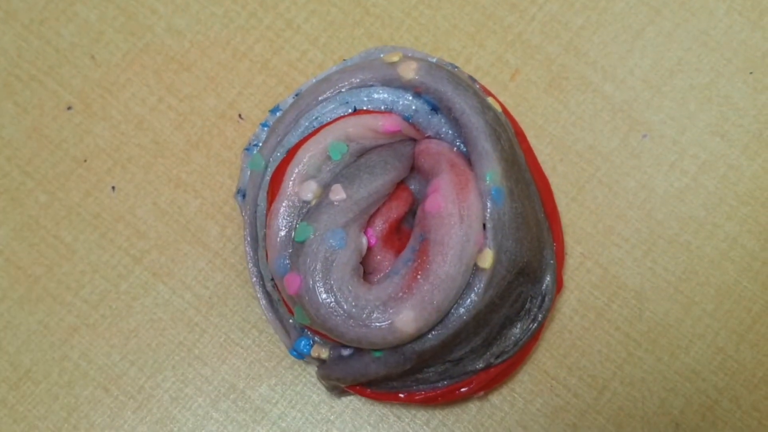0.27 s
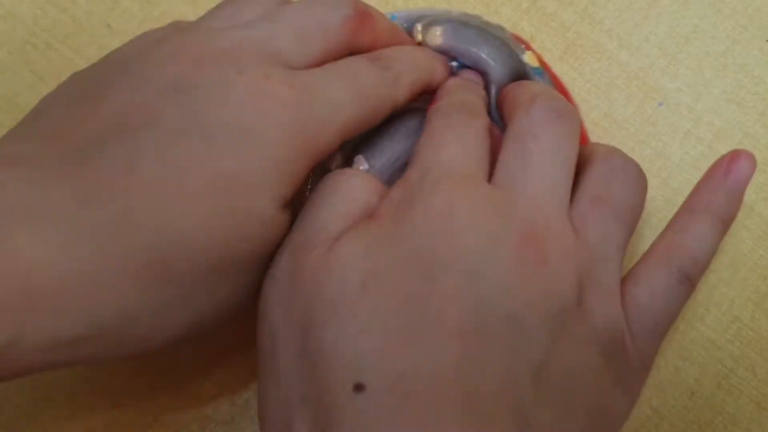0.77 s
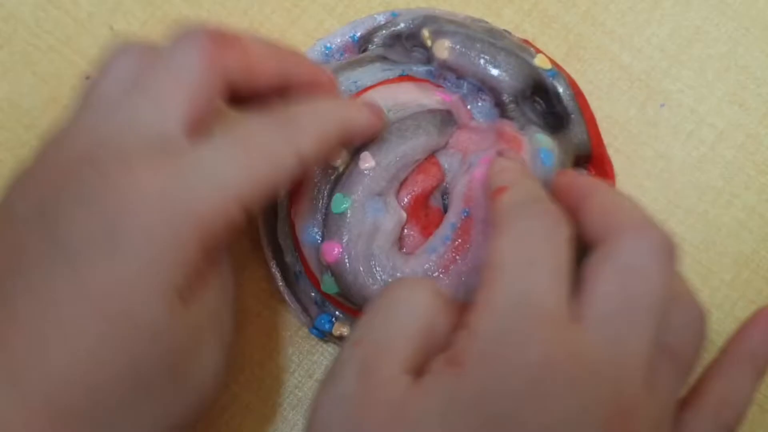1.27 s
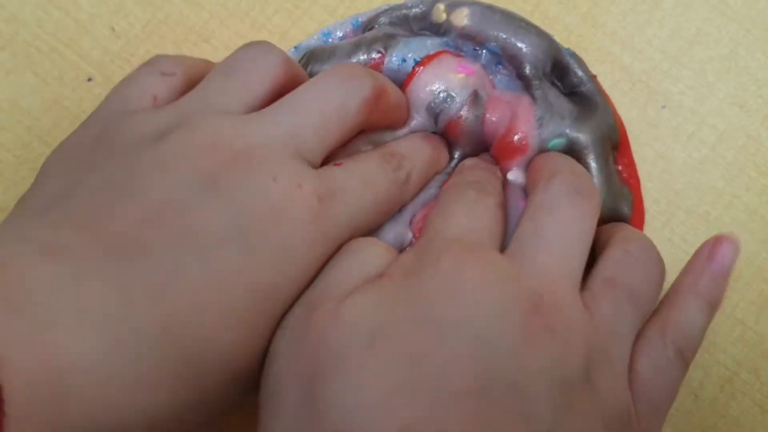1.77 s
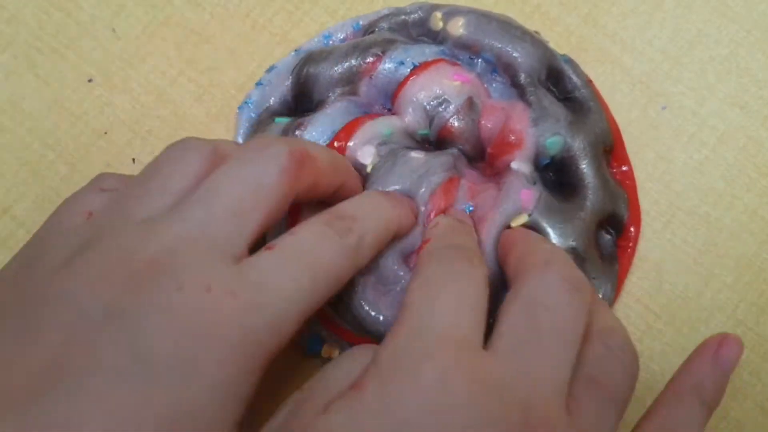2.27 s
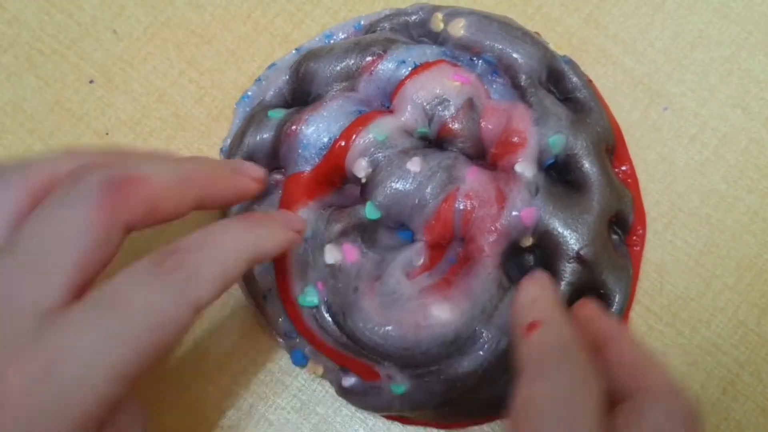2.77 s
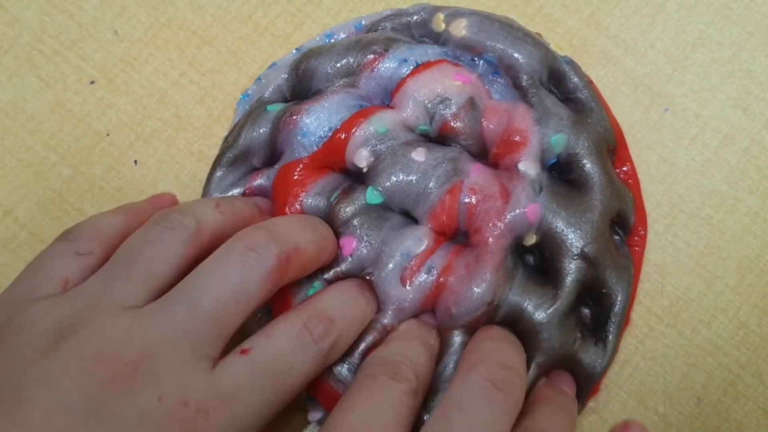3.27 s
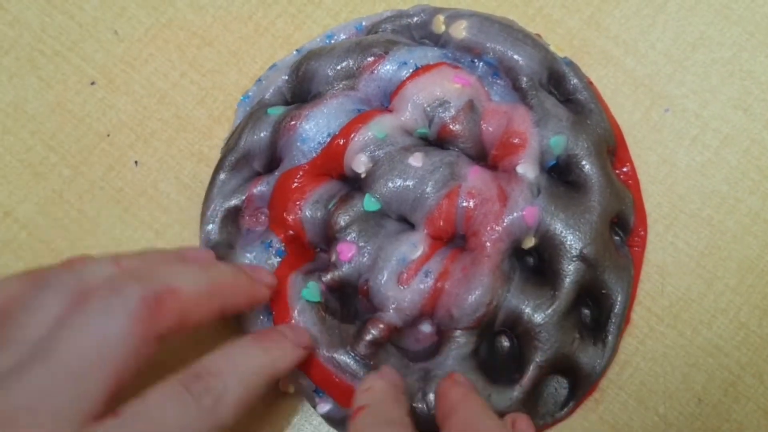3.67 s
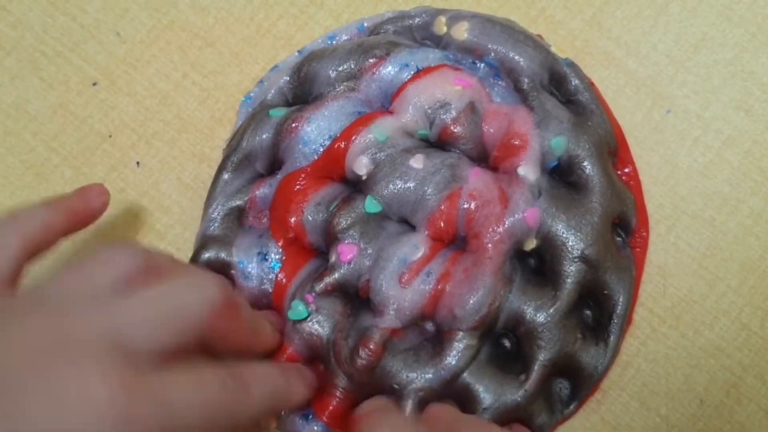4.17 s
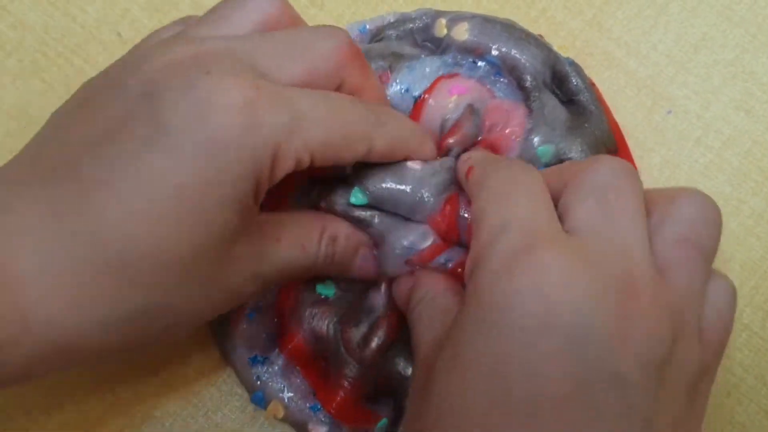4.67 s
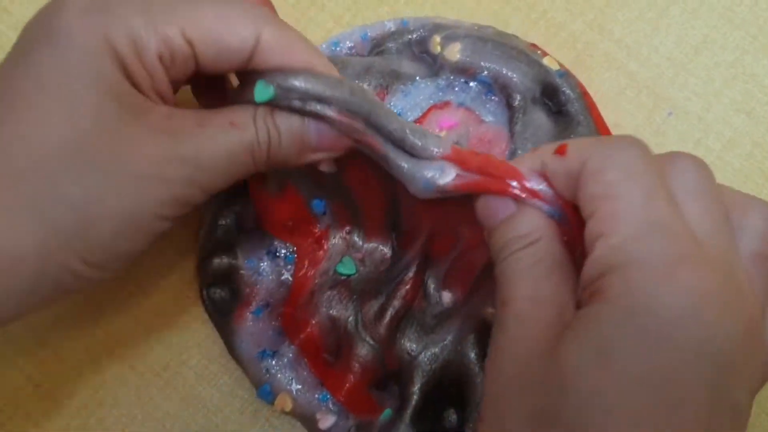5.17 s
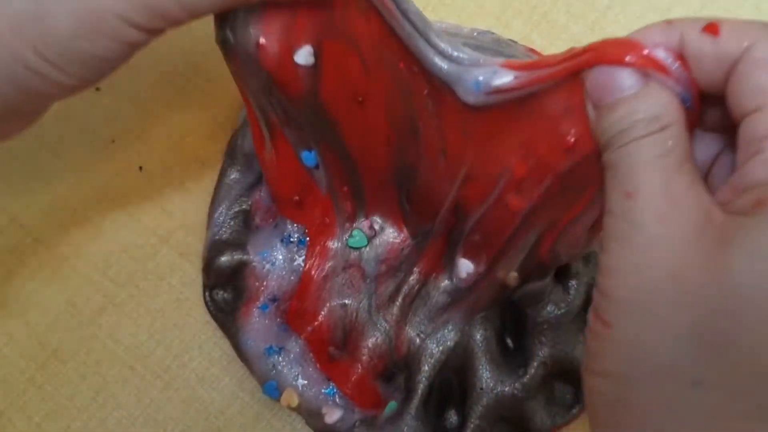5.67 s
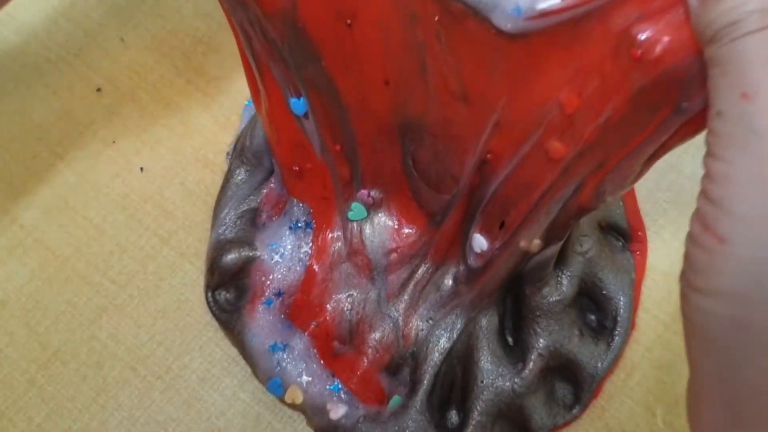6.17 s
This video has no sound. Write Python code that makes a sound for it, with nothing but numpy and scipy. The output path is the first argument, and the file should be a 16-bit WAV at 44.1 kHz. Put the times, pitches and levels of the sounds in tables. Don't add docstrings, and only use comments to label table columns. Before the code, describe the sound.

Close stereo sound of fingers poking and pulling sticky slime. Each release is a very brief, bright, crackling snap with little round pops beneath, followed by a short live room ring. Between them are tiny clicks, squelchy air bubbles and dull low booms from hands pressing the table. Four main bursts in the first half give way to a lighter rip, thin peeling and quiet ticks over soft hiss.

```python
import sys
import numpy as np
from scipy import signal
from scipy.fft import rfft, irfft, next_fast_len
from scipy.io import wavfile
from scipy.ndimage import uniform_filter1d

SR = 44100
rng = np.random.default_rng(int(sys.argv[2]) if len(sys.argv) > 2 else 0)


def how_loud(loudness_db):
    steps = np.asarray(loudness_db, float) / 20
    return 10 ** steps


def put_to_file(sound):
    columns = np.atleast_2d(sound).T
    safe = np.clip(columns, -1, 1)
    whole_steps = np.round(safe * 32767)
    wavfile.write(sys.argv[1], SR, whole_steps.astype(np.int16))


N = 283562


def unit(x):
    return x / np.sqrt(np.mean(x ** 2) + 1e-20)


def along(points, hz):
    point_hz, value = np.transpose(points)
    return np.interp(np.log(hz + 1), np.log(point_hz + 1), value)


def filtered(x, response):
    size = next_fast_len(N + SR // 2)
    return irfft(rfft(x, size) * response(np.fft.rfftfreq(size, 1 / SR)), size)[..., :N]


def thin(x, corner_hz):
    return filtered(x, lambda hz: (1j * hz / (corner_hz + 1j * hz)) ** 2)


def rush(spectrum, alike):
    mid, side = filtered(rng.standard_normal((2, N)), lambda hz: how_loud(along(spectrum, hz)))
    turn = np.arccos(np.clip(alike, -1, 1)) / 2
    mid, side = np.cos(turn) * mid, np.sin(turn) * side
    return unit(np.array([mid + side, mid - side]))


def steady(x, hold_s):
    power = uniform_filter1d(np.mean(x ** 2, 0), int(hold_s * SR))
    return x / np.sqrt(np.abs(power) + 0.038)


def bursts(rows, rise, fade, bell, scatter_s, size):
    s, db, hz, pan_db, cycles = np.transpose(rows)[:, :, None]
    chance = rng.random((len(rows), 2))
    life_s = np.clip(cycles, 0.3, 12) / hz
    start_s = s - rise * life_s
    index = np.floor(start_s * SR).astype(int) + np.arange(size)
    out = []
    for sign in (1, -1):
        late_s = (sign < 0) * (0.00003 + scatter_s * chance[:, 1:])
        t = np.maximum(index / SR - start_s - late_s, 0) / life_s
        shape = (1 - np.exp(-(t / rise) ** 2)) * np.exp(-fade * t - bell * t * t)
        wave = np.sin(2 * np.pi * (hz * life_s * t + chance[:, :1]))
        wave *= shape / shape.max(1, keepdims=True) * how_loud(db + sign * pan_db / 2)
        out.append(np.bincount(index.ravel(), wave.ravel(), N + size)[:N])
    return np.array(out)


def slime():
    tearing = tears(np.vstack([films(), swarms()]))
    direct = thin(tearing, 970) + thin(pops(), 180)
    return direct, thin(tears(bounces()), 1300)


def tears(rows):
    return how_loud(3) * bursts(rows, rise=0.45, fade=2.7, bell=2.3, scatter_s=0.00014, size=144)


def films():
    # (time [s], peak level [dB], pitch [Hz], left-right [dB])
    snaps = [(1.0317, -19.5, 7200, -7.5), (1.064, -17.5, 3380, -11), (1.8028, -2, 14290, -9),
             (1.8062, -9.5, 7500, 1), (1.8331, -2, 11200, -5), (1.8367, -11.5, 7540, 0.5),
             (1.8399, -2.5, 8600, 2), (2.2745, -18.5, 12200, -2.5), (2.3678, -35.5, 9210, 0),
             (2.608, -19, 9900, -2), (2.6386, -10, 10830, 2), (2.6412, -5.5, 10900, 3),
             (2.6434, -2, 10500, -1.9), (1.044, -20.5, 14930, -1.5), (2.6451, -14.5, 6840, -1.5),
             (2.6516, -11, 10100, 0.5), (2.6518, -3, 4470, -10), (3.4316, -27.5, 14570, 3),
             (3.4346, -22.5, 8960, -1), (3.4372, -8, 13600, -0.5), (3.4692, -10.5, 10670, 1),
             (3.9897, -32.5, 9100, 7.5), (4.1235, -28, 10500, 5.5), (4.1332, -14.5, 12500, 5.5),
             (4.1575, -19.5, 10750, 0.5), (4.6346, -15, 7900, 7), (4.6353, -13, 11400, 8),
             (4.6756, -7, 14050, 8), (5.5675, -19.5, 14040, 5.5), (5.5677, -24, 8200, 5),
             (1.0422, -18.5, 7880, -0.5), (1.0447, -22.5, 7540, -0.5), (1.0462, -16, 11670, -1),
             (1.0472, -16.5, 13180, -2.5), (1.0549, -25.5, 7750, -4), (1.8075, -14.5, 12100, -3),
             (1.8392, -6.5, 7700, -2.5), (1.8411, -10.5, 11930, -4.5), (2.6427, -7.5, 7490, 3.5),
             (2.6444, -3, 11900, -2), (3.4365, -14, 9780, 1.5), (3.4385, -9.5, 13800, -3.5),
             (3.4639, -7.5, 6500, -7), (3.4652, -9.5, 11330, -7.5), (3.4667, -8, 11800, -7.5),
             (3.4719, -4.5, 6900, 2), (3.4739, -5.5, 7570, -3), (4.6771, -4.5, 14130, -7),
             (4.6824, -24, 9100, 0), (4.6357, -20.5, 7300, -1)]
    # (time [s], peak level [dB], pitch [Hz], left-right [dB])
    ticks = [(.8712, -35, 9160, -6.5), (1.156, -48.5, 7390, -1.5), (1.1813, -38, 12110, 12.5),
             (1.4435, -51.5, 8120, -17), (2.2161, -33, 10320, -5.5), (2.252, -41, 7890, -5.5),
             (2.279, -30.5, 10620, -11), (2.3322, -36, 14910, -5), (2.3772, -33, 10710, -7),
             (2.4869, -48, 10190, -1), (2.5807, -34, 10410, 3.5), (3.1032, -39, 14520, 4.5),
             (3.114, -40.5, 5280, -2.5), (3.2659, -45.5, 13540, -13.5), (3.6481, -32.5, 13600, 3.5),
             (3.9259, -41, 11590, 2), (4.5632, -41, 9530, 2), (4.8034, -41.5, 8780, -6),
             (4.8257, -31.5, 9550, -14), (4.844, -28, 10670, -7), (4.93, -28.5, 6420, -1),
             (4.9904, -37.5, 7550, 2), (5.0081, -28.5, 12460, 7), (5.0349, -29.5, 11930, 8),
             (5.1604, -34.5, 11100, 1), (5.265, -35.5, 12100, -8.5), (5.9438, -35.5, 6970, 15),
             (6.139, -45.5, 7380, -1), (6.2306, -46.5, 7340, -3), (6.2964, -50.5, 7100, 2.5)]
    snap_life_s, tick_life_s = 0.00019, 0.00029
    twin_db, twin_pitch = -16.5, 0.49
    rows = np.vstack([np.insert(snaps, 4, snap_life_s, axis=1), np.insert(ticks, 4, tick_life_s, axis=1)])
    twins = rows * [1, 1, twin_pitch, 1, 1] + [0, twin_db, 0, 0, 0]
    rows = np.vstack([rows, twins])
    return np.column_stack([rows[:, :4], rows[:, 4] * rows[:, 2]])


def swarms(count=110):
    # (start [s], length [s], grain level [dB], pitch [Hz], left-right [dB])
    rips = [(1.027, 0.016, -43.5, 7650, -2), (1.038, 0.023, -26, 9800, -4), (1.048, .028, -35, 2830, -12),
            (1.057, .03, -51, 5000, -3.5), (1.804, .0098, -29, 3910, 5.6), (1.834, .012, -27, 6530, 4.5),
            (2.606, 0.034, -32.5, 5930, -5), (2.638, 0.02, -27.5, 10540, -8),
            (3.4345, 0.01, -33.5, 11140, 3), (3.459, 0.016, -31, 8330, -3.5),
            (3.461, .015, -44, 3070, -1.5), (4.128, .039, -37.5, 7190, -4),
            (3.4688, 0.0039, -30.5, 8200, -8.5), (4.929, 0.013, -66, 7100, 5.5),
            (1.0275, 0.015, -46, 9050, -3), (2.641, .014, -27, 2990, 3), (1.062, 0.013, -41.5, 3200, -1),
            (1.832, 0.0039, -29, 8850, -6.5), (2.2735, .014, -47.5, 12670, -1.5),
            (4.14, 0.045, -66, 2030, -1), (3.476, 0.029, -47, 2700, -4)]
    # (start [s], length [s], grain level [dB], pitch [Hz], cycles [1])
    peels = [(.319, 0.097, -68.5, 8430, 3.4), (.8, 0.065, -64, 9720, 2.1), (2.224, 0.4, -60.5, 10220, 3.9),
             (2.283, 0.21, -72.5, 1620, 0.9), (3.11, 0.091, -57.5, 5890, 1.5),
             (3.19, 0.055, -67.5, 7080, 3.8), (3.916, 0.041, -58.5, 2430, 0.62),
             (3.92, 0.055, -68, 7960, 6.8), (4.532, 0.093, -56.5, 8850, 2.6),
             (4.628, 0.023, -62, 2440, 1.4), (4.677, 0.05, -35, 13500, 2),
             (4.705, 0.064, -35.5, 13780, 2.1), (4.76, 0.15, -45.5, 11500, 1.6),
             (4.87, .22, -50.5, 9880, 1.7), (4.849, 0.22, -75, 1296, 1.56), (5.148, 0.26, -60, 8060, 4.1),
             (5.41, 0.14, -58.5, 7900, 2.35), (5.43, 0.072, -76.5, 1910, 5.5),
             (5.48, 0.049, -77, 2200, 5.1), (5.9435, 0.0088, -57.5, 3580, 2.47),
             (5.03, 0.026, -69, 2500, 3.2), (4.93, 0.08, -60, 5000, 3.6), (5.57, .07, -70, 3040, 2.1),
             (5.751, 0.16, -80, 2474, 2.3), (6.117, 0.25, -73, 7500, 8)]
    pulls = [
        1.032,
        1.801,
        3.434,
        4.132,
    ]
    # (length [s], grain level [dB], pitch [Hz], left-right [dB], cycles [1])
    strain = [
        (0.02, -48.5, 20000, -5.2, 1.7),
        (0.0053, -47, 20000, -2.3, 1.3),
    ]
    # (start [s], length [s], grain level [dB], pitch [Hz])
    rustles = [(0.746, .11, -65, 1500), (1.514, 0.07, -67.5, 1190), (3.112, 0.073, -68, 1800),
               (4.125, 0.058, -48, 1100), (4.495, .05, -63, 1000), (5.618, 0.035, -78, 1494),
               (5.952, 0.061, -72.5, 984)]
    rip_cycles, peel_pan_db = 1.06, -1.5
    rustle_pan_db, rustle_cycles = -0.8, 1.2
    rows = np.vstack([
        np.insert(rips, 5, rip_cycles, axis=1),
        np.insert(peels, 4, peel_pan_db, axis=1),
        [(s - row[0], *row) for s in pulls for row in strain],
        [(*row, rustle_pan_db, rustle_cycles) for row in rustles]])
    s, length_s, db, hz, pan_db, cycles = rows.T[:, :, None]
    when, size, pitch, side = np.moveaxis(rng.random((len(rows), count, 4)), 2, 0)
    spread_octaves = 2.8 / np.maximum(cycles, 1)
    grain_hz = np.minimum(hz * 2 ** (spread_octaves * (pitch - 0.5)), 16000)
    swell_db = 3.0 * np.log(np.sin(np.pi * when) + 0.033)
    grain_db = db - 3.7 * np.log(size + 0.0052) + swell_db
    grains = [s + length_s * when, grain_db, grain_hz, pan_db + 7 * (side - 0.5), cycles + 0 * when]
    return np.reshape(grains, (len(grains), -1)).T


def pops():
    # (time [s], peak level [dB], pitch [Hz], cycles [1])
    holes = [(1.0456, -23, 1800, 3.9), (1.0635, -27.5, 940, 3.2), (1.0553, -13.5, 1500, 3.7),
             (1.0645, -32, 376, 3.5), (1.071, -30, 1497, 0.83), (1.8008, -24, 1500, 1.3),
             (1.8035, -19.5, 765, 8.2), (1.8046, -15.5, 416.7, 2.1), (1.8095, -33, 2420, 2.8),
             (1.835, -22.5, 1614, 11), (1.8378, -12.5, 837, 4), (1.8402, -15.5, 2410, 7.3),
             (1.8545, -18.5, 849, 2.1), (2.4881, -27.5, 1165, 3.5), (2.4905, -25, 414, 1.7),
             (2.6075, -23, 612, 2.4), (2.611, -21, 457.4, 3.5), (2.6382, -27, 1510, 2.2),
             (2.6465, -14, 1523, 2.7), (2.6526, -16.5, 739, 5.3), (3.2664, -32, 1402, 1.6),
             (3.4367, -19.5, 734, 3), (3.4375, -29.5, 381, 6.1), (3.4424, -24, 730, 4.3),
             (3.4454, -21, 1180, 3.8), (3.4693, -22, 1963, 3.6), (3.4732, -12.5, 1663, 2.7),
             (4.156, -48, 900, 6), (4.1328, -31, 2160, 4.3), (4.1506, -36, 403, 4),
             (1.0665, -29.5, 1404, 4), (1.8033, -24.5, 1832, 3.8), (1.8029, -23.5, 2536, 11),
             (1.8158, -27.5, 512.5, 2.3), (1.8414, -22, 1770, 5), (1.8896, -24.5, 1864, 3.5),
             (1.9016, -27, 1651, 5), (1.9078, -29.5, 872, 3.8), (2.6416, -26, 2983, 4.9),
             (2.6458, -15, 2696, 4), (2.6444, -20, 3653, 5), (2.6473, -15, 773, 3), (2.6836, -21, 623, 2.1),
             (2.6852, -26, 2153, 4), (3.4361, -24.5, 2015, 2), (3.4643, -25.5, 3075, 3.5),
             (3.4676, -27, 770, 3), (4.1474, -34.5, 1020, 2.2), (4.1524, -39, 950, 3.9),
             (4.1676, -53, 1850, 4)]
    # (time [s], peak level [dB], pitch [Hz])
    blips = [(.7255, -57, 910), (.79, -57, 874), (1.033, -42, 377), (1.1418, -40, 990),
             (3.188, -46.5, 1103), (4.5048, -45, 760), (1.5762, -49.5, 830), (1.6299, -42, 320),
             (2.2156, -47.5, 2560), (2.2703, -56, 820), (2.3165, -50, 1080), (2.3405, -47.5, 1058),
             (2.3585, -47, 1200), (2.4168, -49, 382), (2.5005, -45.5, 994), (3.114, -42, 1096),
             (3.1287, -40, 1190), (3.1648, -42, 1150), (3.926, -47.5, 2415), (3.9508, -47, 1160),
             (4.1194, -48, 566), (.8332, -59.5, 839), (4.5045, -45.5, 1086), (4.51, -50.5, 1890),
             (4.5062, -40.5, 410), (4.6375, -40, 401), (4.8974, -53.5, 762), (5.4706, -61, 1850),
             (5.9441, -44, 2300), (5.944, -45.5, 780), (1.142, -42, 1780), (4.872, -54, 1130),
             (4.9088, -62, 732), (4.9357, -62, 1250), (4.9422, -54, 1200), (4.943, -62, 2970),
             (5.0076, -48, 2670), (5.0076, -52.5, 1210), (5.4558, -64, 1040), (5.4652, -49, 2040),
             (5.4832, -48, 1940), (5.4854, -54, 2840), (5.4889, -54, 1900), (5.4927, -53, 1940),
             (5.635, -63, 513), (5.7958, -61, 1815), (5.7968, -58, 820), (5.8295, -61, 1714),
             (5.8314, -60.5, 947), (5.8512, -63, 820), (5.8566, -51.5, 2630), (5.958, -61, 990),
             (5.983, -48, 2600), (1.522, -55, 1110), (1.541, -58, 2500), (1.63, -52.5, 1160)]
    blip_cycles = 3.6
    rows = np.vstack([holes, np.insert(blips, 3, blip_cycles, axis=1)])
    pan_db = rng.normal(-0.42, 1.3, len(rows))
    rows = np.insert(rows, 3, pan_db, axis=1)
    return how_loud(-0.5) * bursts(rows, rise=0.14, fade=2.2, bell=0.079, scatter_s=0.00008, size=2048)


def bounces():
    # (delay [s], level [dB])
    paths = [(.001, -10), (.0022, -9.5), (.0033, -17), (.0048, -12.5)]
    rows = films()
    jitter = rng.uniform(-1.2, 1, (len(rows), len(paths), 5)) * [0.00025, 6, 496.5, 10, 0]
    return (rows[:, None] + np.pad(paths, ((0, 0), (0, 3))) + jitter).reshape(-1, 5)


def table():
    # (time [s], boom level [dB])
    rumble = [(0.0, -62), (1.141, -55.5), (1.401, -62.5), (1.449, -49.5), (1.92, -60), (2.311, -54.5),
              (2.701, -62.5), (3.081, -46), (3.19, -54.5), (3.26, -45.5), (3.65, -56), (3.74, -44.5),
              (3.89, -52.5), (3.94, -44), (4.191, -53.5), (5.07, -62.5), (5.53, -57), (6.43, -60.5)]
    # (frequency [Hz], density [dB per Hz])
    boom_spectrum = [(25, -31.5), (42, -3), (58, 16.5), (85, 12.5), (110, 6.5), (150, -46.5)]
    # (frequency [Hz], density [dB per Hz])
    drag_spectrum = [(90, -32), (135, 12), (190, 0), (330, -10.5), (480, -11), (800, -63.5)]
    # (start [s], length [s], peak level [dB], pitch [Hz])
    shudders = [(3.897, 0.051, -39.5, 90.5), (3.931, 0.054, -27.5, 88.3), (4.016, .04, -41, 89),
                (4.066, 0.041, -39.5, 83), (1.419, 0.023, -43.5, 130), (1.438, .022, -40.5, 126),
                (1.484, 0.013, -42, 129), (1.44, 0.027, -46.5, 386), (1.448, 0.0365, -44, 249),
                (1.473, 0.02, -49, 345), (1.514, 0.025, -44, 214), (1.618, 0.019, -50.5, 242)]
    drag_db, drag_grows = -65.5, 0.47
    t = np.arange(N) / SR
    boom_db = np.interp(t, *np.transpose(rumble))
    boom = how_loud(boom_db + [[-2.5], [2.5]]) * steady(rush(boom_spectrum, 0.72), hold_s=0.11)
    resting = how_loud(drag_db + drag_grows * (boom_db - boom_db.mean()))
    drag_gain = np.hypot(resting, shoves(t)) * how_loud([[-0.4], [0.4]])
    drag = drag_gain * steady(rush(drag_spectrum, 0.85), hold_s=0.3)
    shake = np.zeros(N)
    for start_s, length_s, db, hz in shudders:
        swell = np.sin(np.pi * np.clip((t - start_s) / length_s, 0, 1)) ** 0.82
        shake += how_loud(db) * swell * np.sin(2 * np.pi * hz * (t - start_s))
    return boom + drag + how_loud([[-2.2], [2.2]]) * shake


def shoves(t):
    # (start [s], hold [s], drag level [dB])
    pushes = [
        (1.406, 0.054, -45),
        (3.888, 0.074, -45.5),
        (4.09, 0.014, -52),
        (4.54, 0.024, -62),
    ]
    attack_s, fade_db_per_s = 0.023, 188.5
    gain = np.zeros(len(t))
    for s, hold_s, db in pushes:
        fading_s = np.maximum(t - s - attack_s - hold_s, 0)
        gain += how_loud(db - fade_db_per_s * fading_s) * np.clip((t - s) / attack_s, 0, 1)
    return gain


def room(x, gap_s=0.006, swell_s=0.00083, count=12):
    # (frequency [Hz], t60 [s])
    decay = [(250, 0.32), (660, 0.23), (4500, 0.28), (12000, 0.31)]
    # (frequency [Hz], level [dB])
    wet_colour = [(200, -3), (600, -2.5), (2000, -1.5), (6000, 0), (12000, -1), (15600, -0.5),
                  (16200, -32.5)]
    out, step = np.zeros((2, N + SR)), N // count + 1
    for k in range(count):
        hz, t, z = signal.stft(rng.standard_normal((2, SR // 2)), SR, nperseg=256)
        tail = signal.istft(z * how_loud(-60 * t / along(decay, hz)[:, None]), SR, nperseg=256)[1]
        size = tail.shape[1]
        lines = rfft(tail)
        power = np.abs(uniform_filter1d(np.abs(lines) ** 2, size=70))
        tail = irfft(lines / np.sqrt(power + 1e-9), size)
        tail *= np.clip(np.linspace(8, -2, size), 0, 1)
        tail *= 1 - np.exp(-np.maximum(np.arange(size) / SR - gap_s, 0) / swell_s)
        stretch = x[None, k * step:][:, :step]
        wet = signal.fftconvolve(stretch, tail / np.linalg.norm(tail[0]), axes=1)
        out[:, k * step:][:, :wet.shape[1]] += wet
    left, right = out[:, :N]
    mid = (left + right) / 2
    side = filtered(left - right, lambda hz: 0.5 * hz / np.hypot(hz, 450))
    return how_loud(1.0) * filtered(np.array([mid + side, mid - side]), lambda hz: how_loud(along(wet_colour, hz)))


def scene():
    direct, bounced = slime()
    return direct + bounced + room(direct.mean(0)) + table()


def roll_off(x):
    return signal.sosfilt(signal.butter(12, 17100, fs=SR, output="sos"), x)


def record(dry):
    # (frequency [Hz], density [dB per Hz])
    hiss = [(250, -10), (500, -14.5), (1300, -19), (7500, -27), (10000, -26.5), (12500, -19), (15600, -23),
            (16100, -44)]
    port_hz, port_width_hz, top_hz, ceiling = 7600, 1400, 16700, 0.54

    def port(hz):
        damping = 1j * hz * port_width_hz
        return 1 + 0.47 * damping / (port_hz ** 2 - hz * hz + damping)

    loud = filtered(dry, port)
    rounded = loud / (1 + np.abs(loud / ceiling) ** 4) ** (1 / 4)
    soft = filtered(rounded, lambda hz: hz < top_hz)
    return roll_off(soft + how_loud(-66.0) * rush(hiss, 0.02))


dry = scene()
out = record(dry)
put_to_file(out)
```